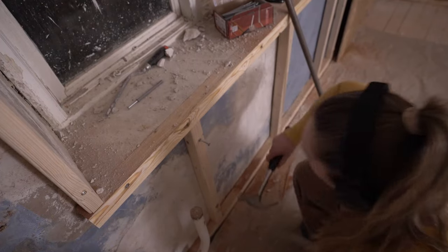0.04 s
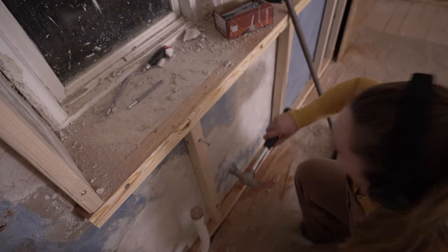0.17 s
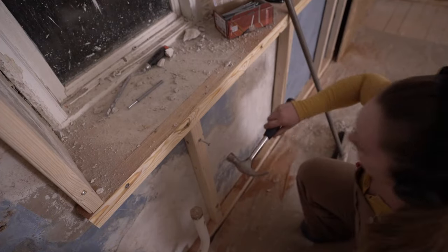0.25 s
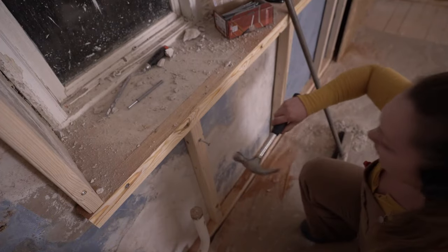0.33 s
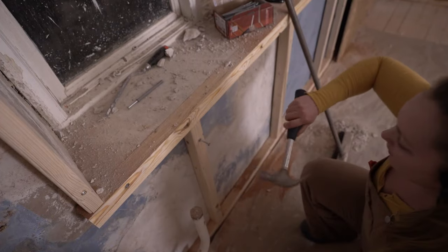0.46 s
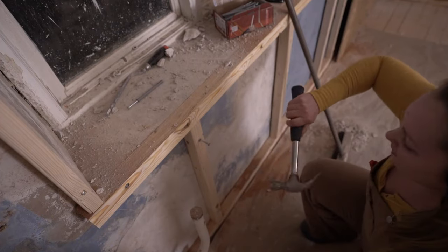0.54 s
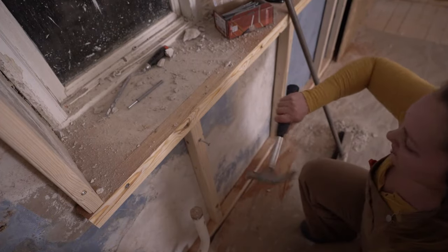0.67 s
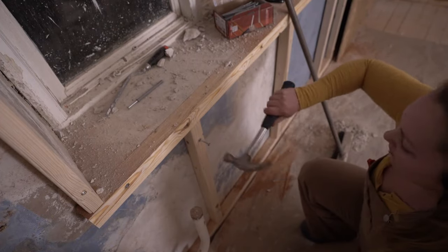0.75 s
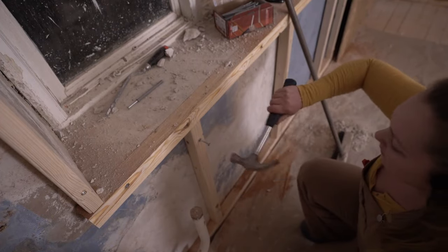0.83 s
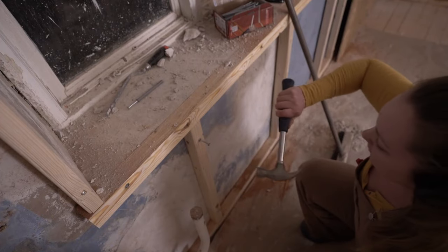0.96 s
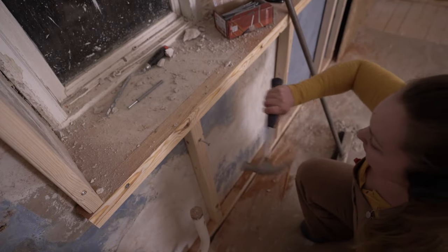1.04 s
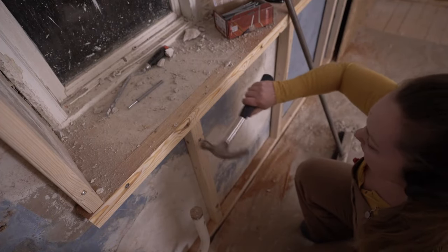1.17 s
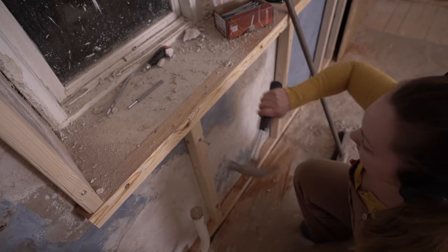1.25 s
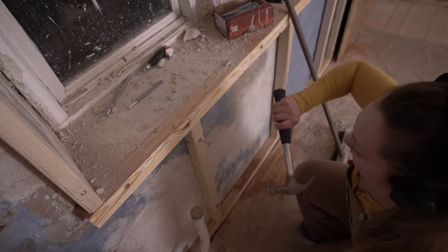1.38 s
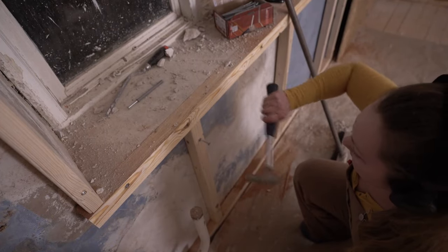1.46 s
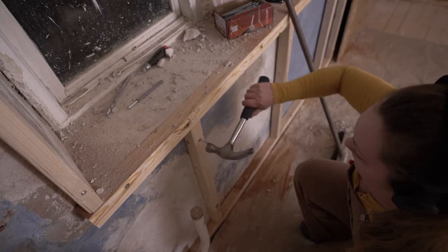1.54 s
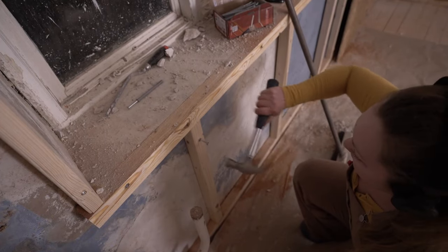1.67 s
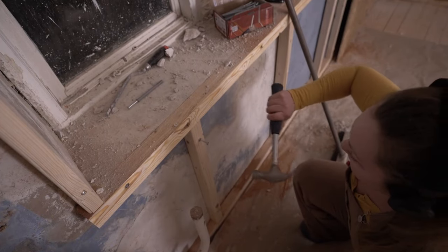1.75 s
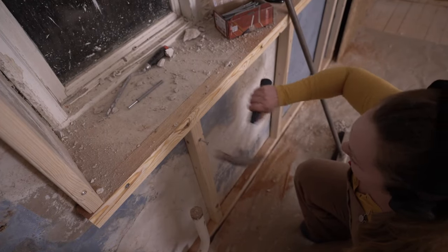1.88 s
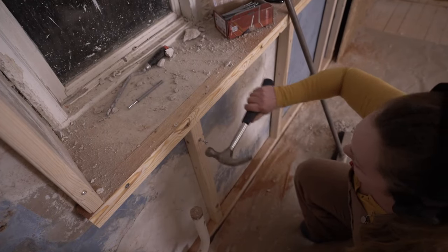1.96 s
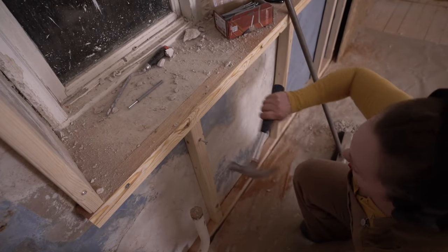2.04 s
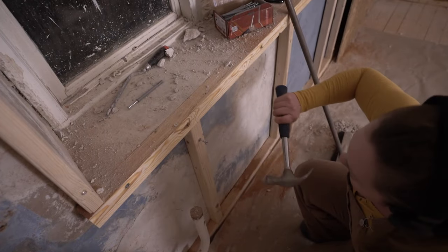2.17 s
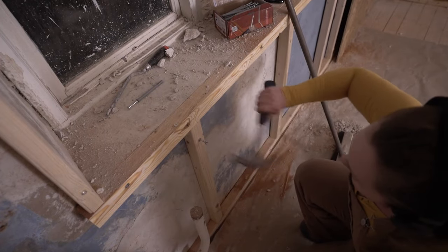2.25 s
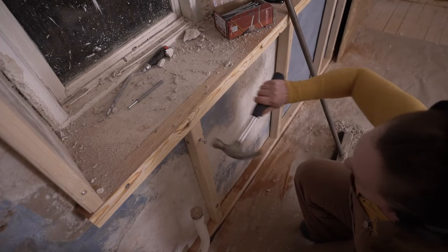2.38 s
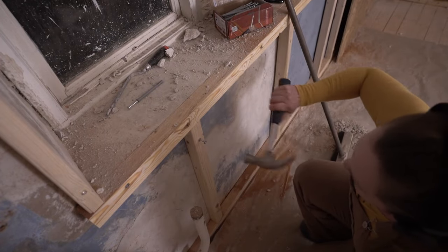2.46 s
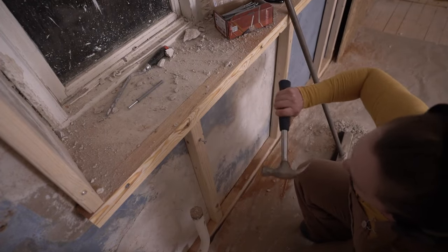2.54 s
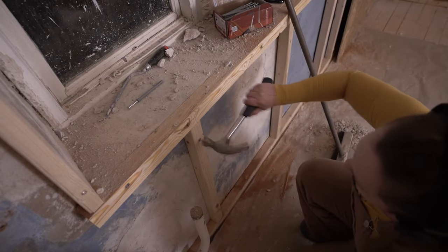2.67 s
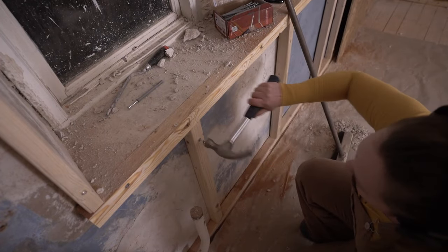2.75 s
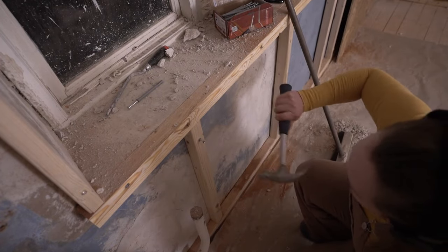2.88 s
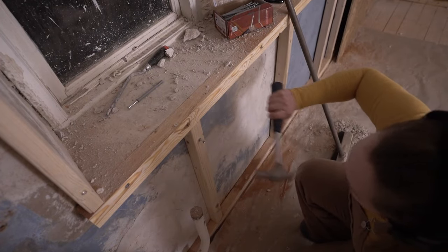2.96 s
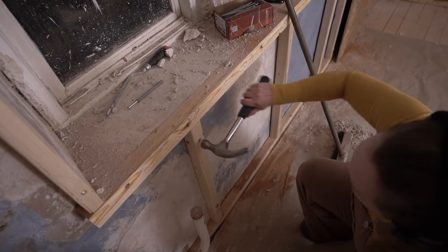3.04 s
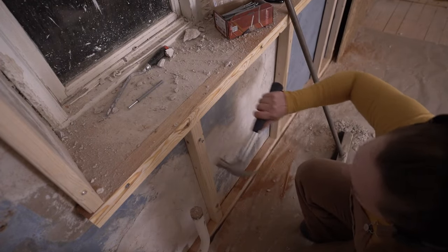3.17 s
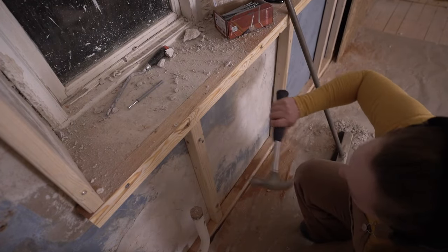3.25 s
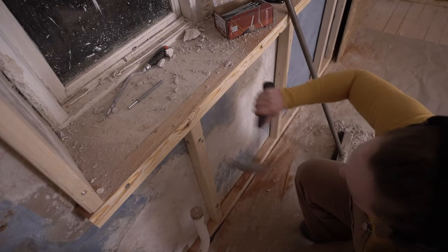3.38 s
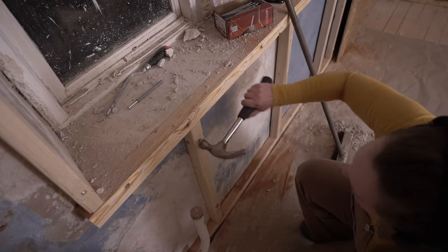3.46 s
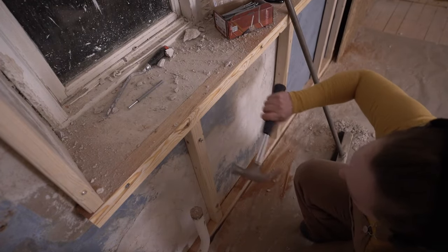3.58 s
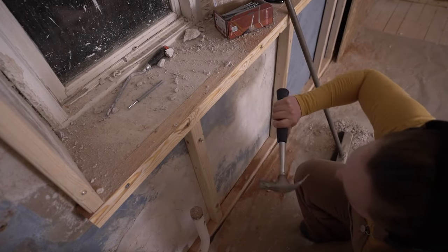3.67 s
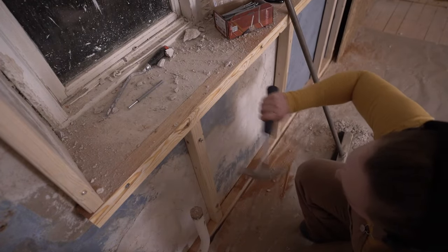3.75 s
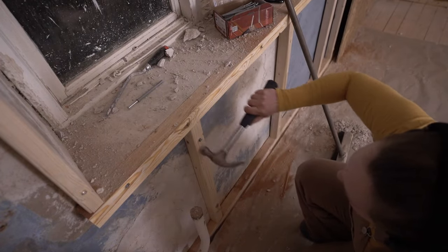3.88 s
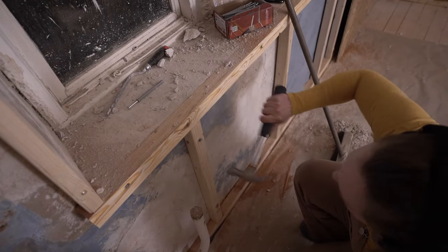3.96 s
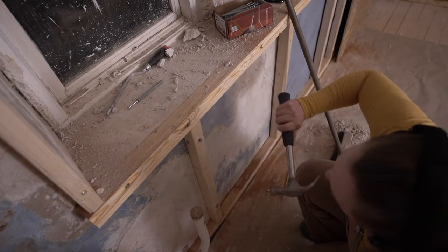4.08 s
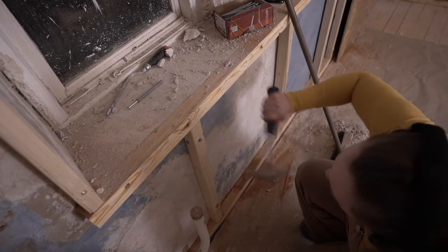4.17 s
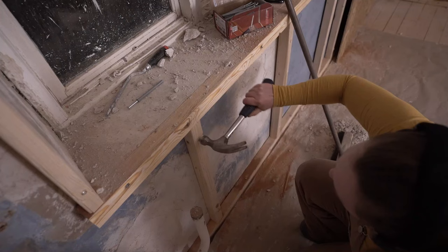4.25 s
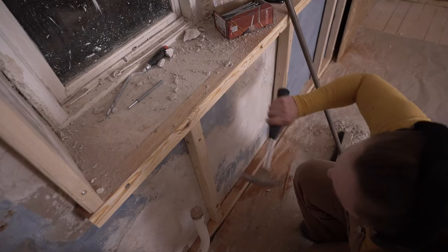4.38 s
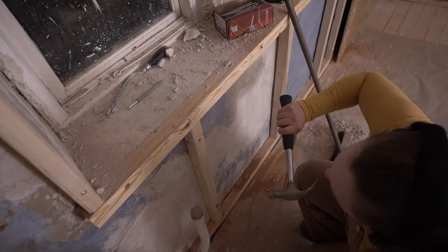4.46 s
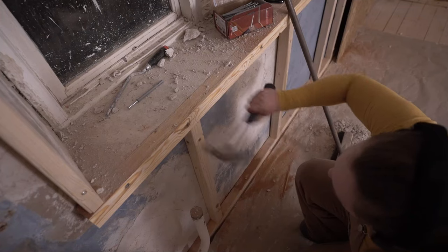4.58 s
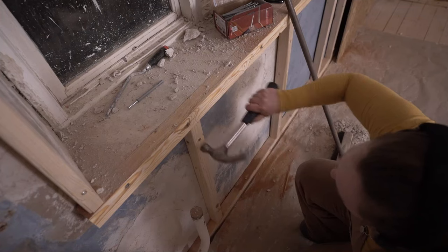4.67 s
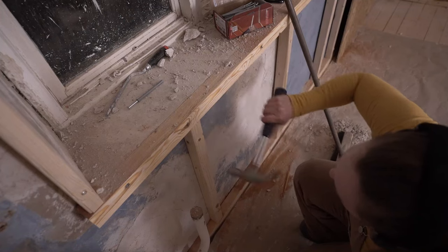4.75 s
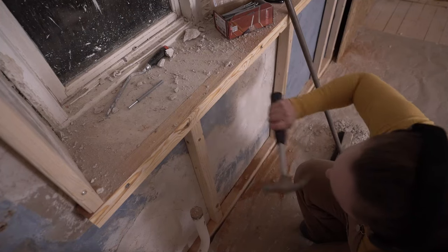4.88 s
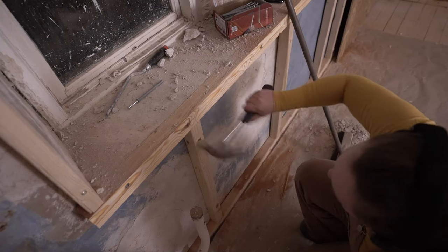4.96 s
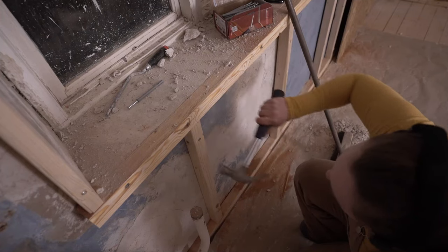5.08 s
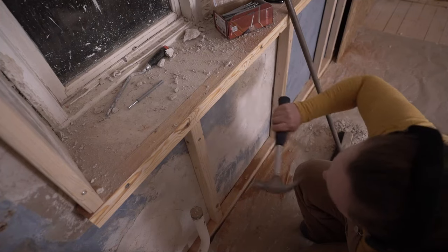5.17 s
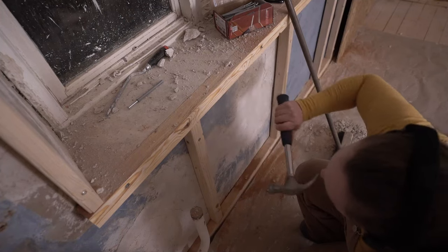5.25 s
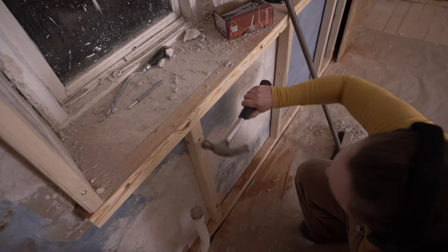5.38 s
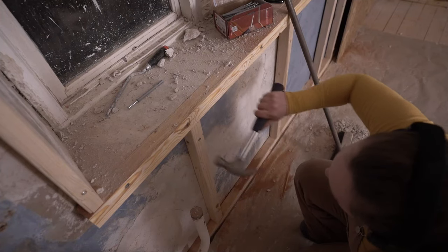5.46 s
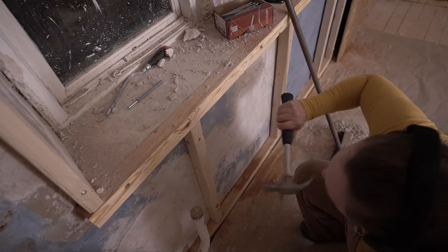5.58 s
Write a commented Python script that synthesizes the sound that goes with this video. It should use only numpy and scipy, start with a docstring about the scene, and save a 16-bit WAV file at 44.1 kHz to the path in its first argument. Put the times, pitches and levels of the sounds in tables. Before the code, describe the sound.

A claw hammer drives a nail into a wooden batten with twelve steady, sharp blows that ring briefly in a bare room.

```python
"""A bare room, one microphone close to a timber batten fixed to the wall.
A claw hammer drives a nail in twelve blows: the first glances off and lands on the wood, the last three
seat the head and shake the frame. Steel pings, the batten knocks, wall and room ring on, and a limiter
holds the cracks to one height. Far below: rustling clothes, light taps, plaster crumbs and a low rumble."""
import sys
import numpy as np
from scipy import signal
from scipy.fft import rfft, irfft
from scipy.io import wavfile
from scipy.ndimage import uniform_filter1d, minimum_filter1d

SR = 44100
rng = np.random.default_rng(int(sys.argv[2]) if len(sys.argv) > 2 else 0)


def dump_mix(stems):
    """Bounce the given channels to the path in sys.argv[1] as a 16-bit WAV at rate SR."""
    frames = np.atleast_2d(stems).T  # one column per channel
    limited = np.clip(frames, -1, 1)  # hard clip at full scale
    pcm = np.round(limited * 32767).astype(np.int16)
    wavfile.write(sys.argv[1], SR, pcm)


N = 247842
AGE = np.arange(SR) / SR  # seconds since a blow

GRIP_S = 2.1  # from the first blow until the nail grips the wall fully
LOOSE_PITCH, GRIPPED_PITCH = 0.839, 1.047  # ratios: the knock rises as the nail sinks and stiffens
LOOSE_THUD_DB, GRIPPED_THUD_DB = -46.5, -35  # the wall takes more of a blow once the nail grips it
KNOCK_DB, FLEX_DB = 3, -12  # of a square blow, relative to its force
GLANCE_KNOCK_DB, GLANCE_FLEX_DB = -10, 11.5  # a glancing blow knocks less and bends the batten more

# hammer blows; the first two rows are one swing, skidding off the nail onto the wood
# (t/s, force/dB, clang/dB relative to the force, slant from 0 square to 1 glancing, treble edge/Hz)
HAMMER_BLOWS = [ (1.15, -37, -9, 0.98, 4970), (1.1721, -32, -34, .01, 1470),
                (1.5791, -39.5, -0.5, 0.19, 4940), (1.9479, -37.5, -3.5, 0.2, 3700),
                (2.324, -35.5, 1.5, 0.33, 4560), (2.707, -33.5, -1.5, .07, 4730),
                (3.0814, -34.5, -2, 0.023, 5960), (3.4645, -33.5, -2.5, 0.079, 5500),
                (3.8410, -33, -8, 0.14, 5470), (4.262, -32.5, 0.5, .08, 7730),
                (4.6407, -26.5, -8, 0.034, 4900), (5.0133, -25, -5, 0.069, 3960),
                (5.4034, -25, -7.5, 0.023, 2860)]
def hammering(echoes):
    """Each blow sounds batten, frame, steel and wall, in shares set by its slant and the nail's grip."""
    out, spot = np.zeros(N), rng.standard_normal(SR)
    for start, force_db, clang_db, slant, edge_hz in HAMMER_BLOWS:
        grip = np.clip((start - HAMMER_BLOWS[0][0]) / GRIP_S, 0, 1)
        glance = min(slant ** 2, 1)  # share of the energy that goes sideways
        grain = spot + undb(5) * rng.standard_normal(SR)  # the same spot sounds partly alike each time
        crack = knock(between(LOOSE_PITCH, GRIPPED_PITCH, grip), edge_hz, echoes)
        wood = burst(crack, KNOCK_DB + GLANCE_KNOCK_DB * glance)
        wood += burst(flex(), FLEX_DB + GLANCE_FLEX_DB * glance)
        wood += burst(frame(grain, edge_hz), db=0)
        wood += burst(timber(), clang_db - 9)
        steel = burst(clang(echoes), clang_db)
        steel += slant * burst(ping(glance, echoes), db=2)
        wall = undb(between(LOOSE_THUD_DB, GRIPPED_THUD_DB, grip)) * thud(rng.standard_normal(SR))
        add(out, undb(force_db) * (wood + steel) + wall, start)
    return out


# heavily damped modes of the batten under the nail, at pitch ratio 1 (f/Hz, level/dB, t60/s)
BATTEN_MODES = [(851, -11.5, 0.035), (1243, -1, 0.012), (1497, 3, 0.012), (1724, -0.5, 0.02),
                (2032, 0.5, 0.0088), (2397, -2.5, 0.0095), (2870, -12.5, 0.035), (3392, -9.5, .016)]
# bounces off the floor, wall and sill beside the nail (delay t/s, level/dB)
NEAR_BOUNCES = [(.0022, -4), (.0040, -16.5), (.0064, -7)]
def knock(pitch, edge_hz, echoes):
    """A contact click, then the batten's crack reaches the microphone directly and off nearby surfaces."""
    contact = signal.lfilter([1], [1, -.5], rng.standard_normal(SR)) * np.exp(-AGE / .0012)
    near = undb(-16) * contact
    direct = (0.00025, 0.0083)
    for delay_s, db in [direct] + NEAR_BOUNCES:
        # each path leaves a different face of the batten and has its own colour
        crack = ring(BATTEN_MODES, pitch, detune=.05, scatter_db=1)
        near += undb(db) * np.pad(crack, (int(delay_s * SR), 0))[:SR]
    lowpass = signal.butter(2, min(3.6 * edge_hz, .45 * SR), fs=SR, output="sos")
    return in_room(signal.sosfilt(lowpass, near), echoes, wet_db=-9)


# spectrum of the shaken frame (f/Hz, level/dB)
FRAME_SPECTRUM = [(150, -5), (300, -2), (500, -2), (850, -0.5), (1100, 1), (1600, -1.5), (2200, -11),
                  (3400, -4), (4800, -8), (6600, -4), (8000, -8.5), (11000, -17), (15500, -33)]
def frame(noise, edge_hz):
    """The crowded modes of the frame fill the room; a blow on wood is duller than one on steel."""
    return die_away(coloured(dulled(noise, edge_hz), FRAME_SPECTRUM), build_s=0.000346)


# modes of the hammer, the nail and the wood that grips it (f/Hz, level/dB, t60/s)
CLANG_MODES = [(818.4, -7.5, 0.073), (1350, -6.5, 0.02), (1650, -7, 0.014), (1878, -15.5, 0.045),
               (2542, -5, 0.063), (2771, -8, 0.04), (3265, -2, 0.038), (3397, 1.5, 0.026),
               (3540, 1.5, 0.022), (4160, -8, 0.034), (4348, -4, 0.027), (5080, -6.5, 0.027),
               (5390, -9, 0.03), (5960, -8, 0.021), (6520, -7, 0.015)]
def clang(echoes):
    """Hammer and nail ring briefly together, heard more off the walls than directly."""
    return in_room(ring(CLANG_MODES, 1, detune=0.014, scatter_db=2.5), echoes, wet_db=3)


# modes of steel meeting steel, at damping 1 (f/Hz, level/dB, t60/s)
PING_MODES = [(8700, -11, .008), (9300, 0, .02), (9440, -9, .015), (9900, -8, .006)]
def ping(glance, echoes):
    """A square blow damps the steel's ping and raises it a little; a glancing one lets it sing."""
    damping = between(2.1, 0.32, glance)
    modes = np.array(PING_MODES) / [1, 1, damping]
    return in_room(ring(modes, pitch=damping ** .005, detune=.002, scatter_db=1), echoes, wet_db=-11)


# lasting modes of the timber that holds the nail (f/Hz, level/dB, t60/s)
TIMBER_MODES = [(441, -8, .55), (848, 2, .55), (1213, -7, .4), (1338, -4, .5), (1374, -7, .45),
                (1617, -7, .4), (1707, -8, .4)]
def timber():
    """The clanging nail sets the timber round it singing."""
    return ring(TIMBER_MODES, 1, detune=.002, scatter_db=1.5)


# bending modes of the batten (f/Hz, level/dB, t60/s)
FLEX_MODES = [(238.5, -2, 0.21), (290, 4.5, 0.26), (307.4, -3.5, 0.61), (346, -12, 0.14)]
def flex():
    """The batten flexes between its fixings, taking a moment to get moving."""
    return ring(FLEX_MODES, 1, detune=.015, scatter_db=1.5) * (1 - np.exp(-AGE / .002))


# low modes of the wall behind the batten, played 5 % flat (f/Hz, level/dB, t60/s)
WALL_MODES = [(57, -10, 1), (68.2, -1.5, 0.69), (119.3, -11.5, 1), (168.5, -5.5, 0.54), (184.7, 1.5, 0.39),
              (218.5, -5.5, 0.66)]
# spectrum of the boom of wall and floor (f/Hz, level/dB)
BOOM_SPECTRUM = [(22, -11.5), (38, 0), (62, 8.5), (95, -0.5), (170, -1), (300, -1.5), (500, -4.5),
                 (1000, -42), (4000, -69)]
def thud(noise):
    """The heavy wall answers late, with a few low modes and a boom of equal energy."""
    modes = ring(WALL_MODES, pitch=0.95, detune=0.012, scatter_db=1) * (1 - np.exp(-AGE / 0.017))
    boom = die_away(coloured(noise, BOOM_SPECTRUM), build_s=0.0067)
    return undb(31) * (modes / np.linalg.norm(modes) + boom / np.linalg.norm(boom))


# light taps before the first blow (t/s, level/dB, pitch ratio)
LIGHT_TAPS = [(.148, -75, 1.3), (.181, -59.5, 0.85), (0.321, -82, 1.4)]
def taps(echoes):
    """The hammer touches the wood as it is brought up to the nail."""
    out = np.zeros(N)
    for start, db, pitch in LIGHT_TAPS:
        add(out, burst(knock(pitch, edge_hz=3500, echoes=echoes), db), start)
    return out


# spectrum of rubbing cloth (f/Hz, level/dB)
CLOTH_SPECTRUM = [(200, -6.5), (1400, 4.5), (3500, 2.5), (6000, -6.5), (9000, -7), (15000, -31)]
# swells of rustling (peak t/s, half length/s, gain/dB, treble edge/Hz)
CLOTH_SWELLS = [(0.211, 0.052, -68.5, 6940), (0.319, 0.065, -69, 14000), (0.528, 0.069, -76.5, 18000),
                (.6, 0.46, -80, 5000)]
def clothes():
    """Clothes rustle softly as the body shifts; their creases make the level flicker."""
    out, t = np.zeros(N), np.arange(N) / SR
    creases = uniform_filter1d(rng.standard_normal(N), size=300)
    cloth = coloured(rng.standard_normal(N), CLOTH_SPECTRUM) * undb(2 * creases / np.std(creases))
    for peak_s, half_s, db, edge_hz in CLOTH_SWELLS:
        swell = np.exp(-((t - peak_s) / half_s) ** 2)
        out += dulled(cloth, edge_hz) * undb(db) * swell
    return out


# crumbs of plaster landing (t/s, level/dB)
PLASTER_CRUMBS = [(4.555, -73), (5.280, -75), (5.557, -81)]
def crumbs(echoes):
    """Loose plaster lands with tiny bright ticks."""
    out = np.zeros(N)
    for start, db in PLASTER_CRUMBS:
        grit = coloured(rng.standard_normal(SR), [(4000, -0.5), (8000, -9), (15000, -18)])
        tick = grit * np.exp(-AGE / 0.0016)
        add(out, burst(in_room(tick, echoes, wet_db=-6), db), start)
    return out


# reverberation of the bare room (f/Hz, t60/s)
ROOM_DECAY = [(40, 1.1), (110, 0.84), (280, .63), (740, 0.39), (1940, 0.49), (5120, 0.32), (9000, 0.27),
              (14000, 0.25)]
def die_away(noise, build_s):
    """Dense reflections build up, then fade in overlapping octave bands, the treble first."""
    centres_hz = np.geomspace(32, 16384, 10)[:, None]
    bin_hz = np.clip(np.arange(SR // 2 + 1), 32, 16384)
    bands = np.maximum(1 - abs(np.log2(bin_hz / centres_hz)), 0)
    fades = np.exp(-np.log(1000) / along(ROOM_DECAY, centres_hz) * AGE)
    tail = (irfft(rfft(noise) * bands, SR) * fades).sum(axis=0)
    return tail * (1 - np.exp(-AGE / build_s))


def in_room(x, echoes, wet_db):
    """A sound reaches the microphone, followed by its reflections."""
    return x + undb(wet_db) * signal.fftconvolve(x, echoes)[:SR]


# spectrum of the quiet room (f/Hz, level/dB)
ROOM_TONE_SPECTRUM = [(12, -32), (20, 0.5), (38, -3), (168, -16.5), (216, -14.5), (410, -13), (485, -17.5),
                      (660, -18), (780, -25.5), (1090, -23), (1220, -26), (1400, -20), (1660, -27),
                      (8180, -51.5), (16000, -58)]
def room_tone():
    """A faint, steady rumble all round the microphone."""
    return coloured(rng.standard_normal(N), ROOM_TONE_SPECTRUM) * undb(-61.5)


def ring(modes, pitch, detune, scatter_db):
    """Damped modes; each blow lands a little differently and shifts their pitch and strength."""
    hz, db, t60 = np.transpose(modes)[:, :, None]
    pitch_draw, level_draw = rng.standard_normal((len(modes), 2)).T[:, :, None]
    # neighbouring modes swing against each other, which fills the gaps between them
    size = (-1) ** np.arange(len(modes))[:, None] * undb(db + scatter_db * level_draw)
    t = AGE[:min(SR, int(t60.max() * SR))]
    tuned_hz = hz * pitch * (1 + detune * pitch_draw)
    waves = size * np.sin(2 * np.pi * tuned_hz * t) * np.exp(-np.log(1000) * t / t60)
    return np.pad(waves.sum(axis=0), (0, SR - len(t)))


def coloured(x, points):
    """Give a noise a spectrum, at rms 1."""
    hz = np.arange(len(x) // 2 + 1) * SR / len(x)
    y = irfft(rfft(x) * undb(along(points, hz)), len(x))
    return y / np.std(y)


def dulled(x, edge_hz):
    """Roll the treble off above an edge."""
    hz = np.arange(len(x) // 2 + 1) * SR / len(x)
    return irfft(rfft(x) / np.sqrt(1 + (hz / edge_hz) ** 3.9), len(x))


def along(points, hz):
    """Read (f/Hz, value) points on a log-frequency axis."""
    at, value = np.transpose(points)
    return np.interp(np.log(np.maximum(hz, 1)), np.log(at), value)


def burst(x, db):
    """Scale a sound by the rms level of its first 50 ms."""
    return x * undb(db) / np.sqrt(np.mean(x[:SR // 20] ** 2))


def add(out, x, start):
    """Mix a sound in at a time."""
    i = int(start * SR)
    out[i:i + len(x)] += x[:N - i]


def undb(db):
    """Decibels to gain."""
    return 10 ** (np.asarray(db) / 20)


def between(a, b, share):
    """Go a share of the way from a to b."""
    return a + (b - a) * share


def scene():
    """The work and the quiet room behind it, in mono at the microphone."""
    echoes = die_away(rng.standard_normal(SR), build_s=0.0008)
    echoes /= np.linalg.norm(echoes)
    rumble = room_tone()
    return (hammering(echoes) + clothes() + taps(echoes) + crumbs(echoes) + rumble)[None]


def limiter(x, ceiling_db, release_db_per_s):
    """Peaks pull the gain down at once; it climbs back while the room is still ringing."""
    over_db = np.maximum(20 * np.log10(abs(x) + 1e-9) - ceiling_db, 0)
    climb_db = release_db_per_s * np.arange(N) / SR
    cut_db = np.maximum.accumulate(over_db + climb_db, axis=-1) - climb_db
    return x * uniform_filter1d(minimum_filter1d(undb(-cut_db), size=31), size=31)


MIC_BAND_HZ, CLIP_DB, TOP_HZ = (36.5, 13100), -14.2, 16000
def record(dry):
    """The microphone trims bass and treble, a limiter ducks each crack, and the peaks are rounded off."""
    microphone = signal.butter(2, MIC_BAND_HZ, "band", fs=SR, output="sos")
    held = limiter(signal.sosfilt(microphone, dry), ceiling_db=-12.5, release_db_per_s=162)
    rounded = held / (1 + abs(held / undb(CLIP_DB)) ** 8) ** (1 / 8)
    top_cut = signal.ellip(8, .2, 70, TOP_HZ, fs=SR, output="sos")
    return signal.sosfilt(top_cut, rounded)


dry = scene()
out = record(dry)
dump_mix(out)
```